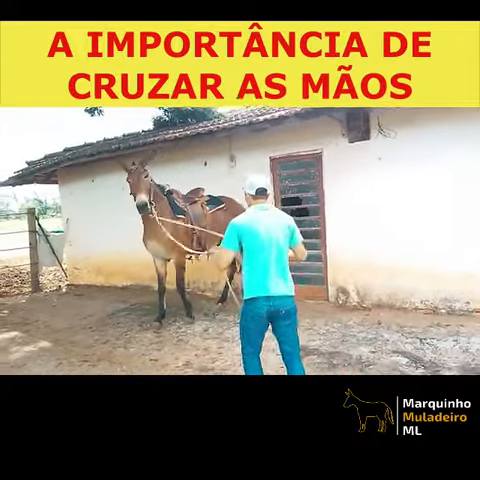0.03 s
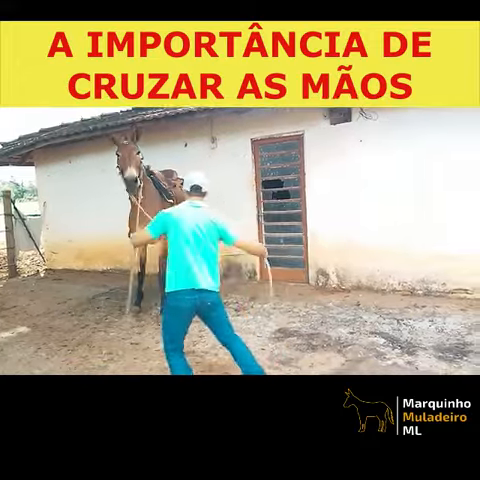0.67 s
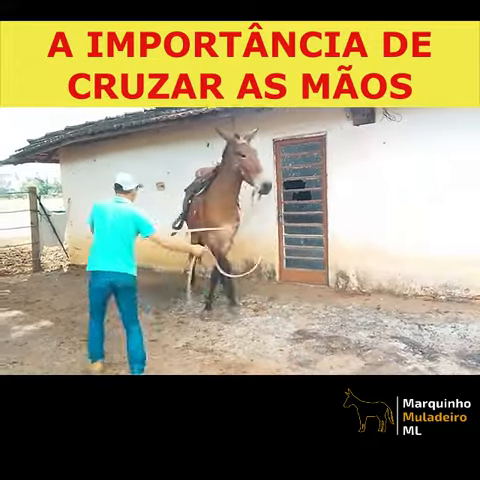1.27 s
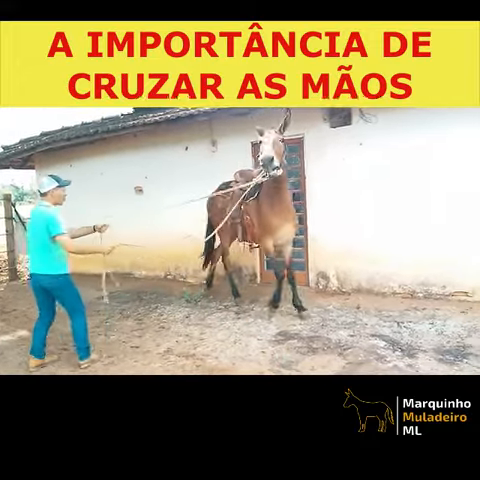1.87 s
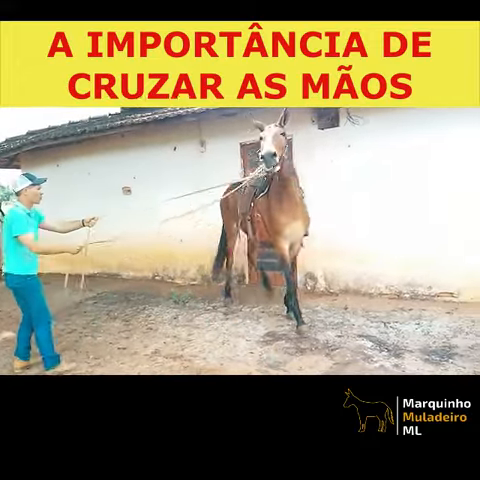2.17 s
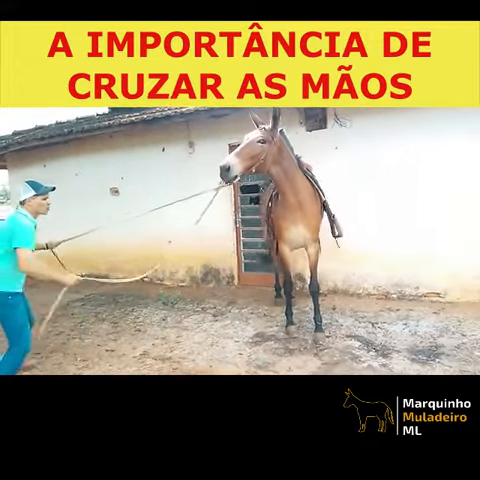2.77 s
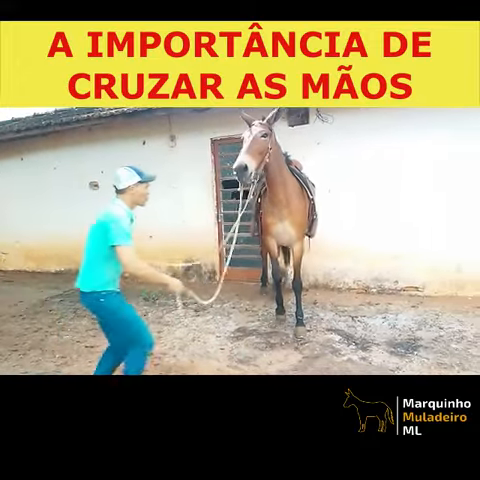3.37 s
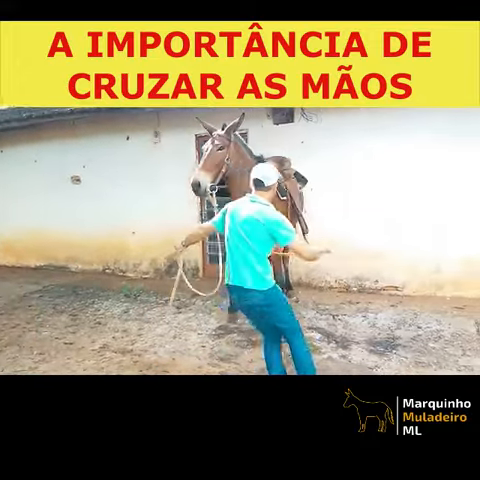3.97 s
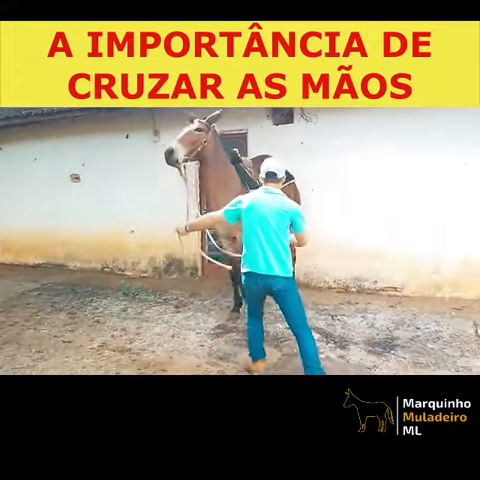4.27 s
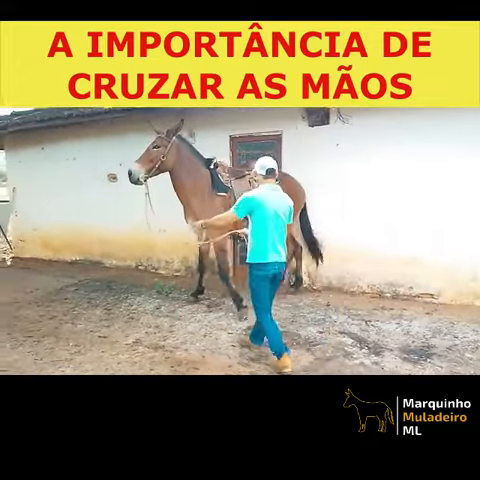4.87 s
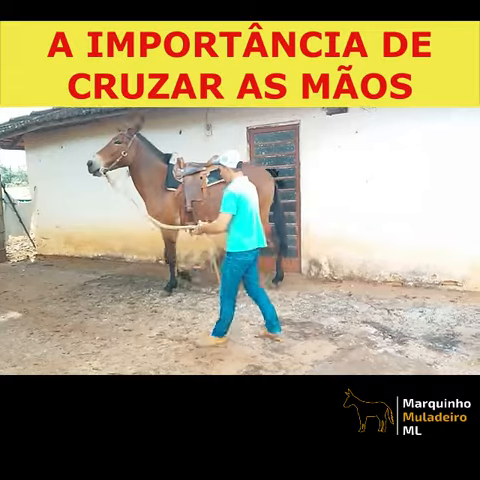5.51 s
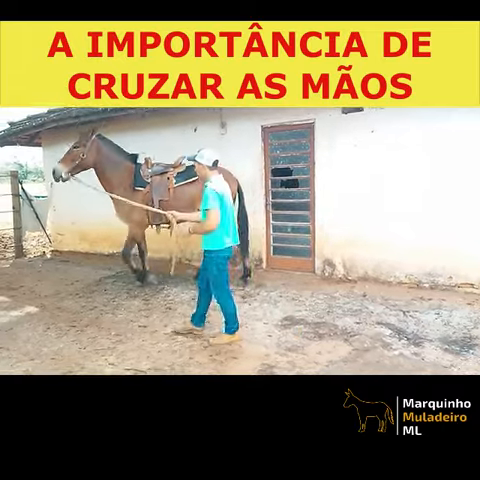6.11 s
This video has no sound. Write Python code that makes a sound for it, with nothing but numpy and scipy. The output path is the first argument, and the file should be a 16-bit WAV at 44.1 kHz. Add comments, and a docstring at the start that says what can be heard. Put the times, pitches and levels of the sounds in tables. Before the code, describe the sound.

Uneven hoof steps and dragging feet crunch on packed dirt in a quiet yard, with faint bird chirps.

```python
"""A mule steps sideways on hard, gritty dirt a few metres off, in still air; a house wall and eaves answer briefly.
Feet drag and kick up sand from the start. From 0.2 s hooves land: a sharp contact, then a crush of grit
that rings the hoof, deepened by weight, brightened by loose grit. Hooves and boots scuff in between,
with a few soft thumps from 1.3 s. Small birds whistle faintly from 1.75 s, a long hollow scrape comes
at 4.1 s, and a thin, far shrill enters near 6 s."""
import sys
import numpy as np
from scipy import signal
from scipy.fft import rfft, irfft
from scipy.io import wavfile
from scipy.ndimage import uniform_filter1d

SR = 44100
rng = np.random.default_rng(int(sys.argv[2]) if len(sys.argv) > 2 else 0)


def to_wav(s):
    """Save 16-bit WAV."""
    ch = np.atleast_2d(s).T  # columns
    pcm = np.round(np.clip(ch, -1, 1) * 32767)  # PCM
    wavfile.write(sys.argv[1], SR, pcm.astype(np.int16))


N = 270948
HIT_SAMPLES = 8192
# Spectrum of crushed dirt. Each row: frequency in Hz, gain in dB.
DIRT_SPECTRUM = [(30, -21), (90, -41), (150, -28.5), (200, -3), (280, 1.5), (600, -4), (1500, -2.5),
                 (2200, -1), (4300, 4.5), (7000, -10.5), (9000, -15), (12000, -25), (16000, -40)]


def undb(db):
    """Decibels to gain."""
    return 10 ** (np.asarray(db) / 20)


def unit(x):
    """Scale to rms 1."""
    return x / np.sqrt(np.mean(x ** 2))


def add(track, start_s, sound):
    """Mix a sound in at a time."""
    start = max(int(start_s * SR), 0)
    track[start:start + len(sound)] += sound[:N - start]


def band(x, lo_hz, hi_hz, order=3):
    """Causal band-pass."""
    sos = signal.butter(order, [lo_hz, min(hi_hz, SR / 2 - 1)], "band", fs=SR, output="sos")
    return signal.sosfilt(sos, x)


def ring(x, hz, width_hz):
    """One damped resonance, gain 1 at its centre."""
    return signal.lfilter(*signal.iirpeak(hz, hz / width_hz, fs=SR), x)


def colour(x, points, size=4096):
    """Minimum-phase filter through (Hz, dB) points."""
    hz, db = np.transpose(points)
    grid_hz = np.maximum(np.arange(size // 2 + 1) * SR / size, 1)
    gain = undb(np.interp(np.log(grid_hz), np.log(hz), db))
    cepstrum = irfft(np.log(gain))
    cepstrum[1:size // 2] *= 2
    cepstrum[size // 2 + 1:] = 0
    response = irfft(np.exp(rfft(cepstrum)))
    return signal.fftconvolve(x, response)[:len(x)]


def wander(rate_hz):
    """Smooth random drift, rms 1."""
    hold = int(SR / rate_hz)
    steps = np.repeat(rng.standard_normal(N // hold + 1), hold)
    return unit(uniform_filter1d(steps, hold)[:N])


def grains(per_s, spread_db, size=N):
    """Impulses at random moments, a few much larger than the rest; rms 1."""
    happens = rng.random(size) < per_s / SR
    strength = undb(spread_db * np.minimum(rng.exponential(size=size), 4))
    return unit(happens * strength * rng.choice([-1, 1], size))


def air(hush_db=-64.5, hush_swell_db=1, rumble_swell_db=3):
    """Distant outdoor hush over a faint, wavering rumble."""
    # Still air. Each row: frequency in Hz, gain in dB.
    spectrum = [(30, -27), (70, -22), (110, -16), (155, -4), (260, 12), (500, -14), (1500, 0), (3000, -1),
                (4400, 7), (6000, -19), (9000, -18), (16000, -39)]
    # Low rumble. Each row: time in seconds, mean level in dB.
    rumble_curve = [(.35, -79.5), (1.6, -91), (2.07, -72), (2.3, -87), (4.3, -84.5), (4.9, -72.5),
                    (5.4, -89.5), (6.1, -73)]
    hush = unit(colour(rng.standard_normal(N), spectrum)) * undb(hush_db + hush_swell_db * wander(0.47))
    rumble_db = np.interp(np.arange(N) / SR, *np.transpose(rumble_curve))
    rumble = unit(band(rng.standard_normal(N), 89, 120, order=2))
    return hush + rumble * undb(rumble_db + rumble_swell_db * wander(5.2))


def drag_envelopes(attack_s=0.014, release_s=0.033, rest_rub_db=-69.5, rest_sand_db=-91):
    """Gains of rub and sand: each drag sets in, holds and dies back to feet only shifting their load."""
    # Drags over loose dirt. Each row: start in seconds, length in seconds, relative rub and sand in dB.
    drags = [(0.024, 0.091, -46, -71), (0.225, 0.14, -63.5, -56), (0.553, 0.055, -59, -51.5),
             (0.64, 0.28, -53, -56), (0.972, 0.065, -43.5, -70), (1.252, 0.074, -56, -56),
             (1.918, 0.18, -49.5, -49.5), (2.274, 0.21, -49, -47), (2.552, 0.44, -56.5, -53.5),
             (3.095, 0.073, -42, -38.5), (3.335, 0.22, -53.5, -51.5), (3.664, 0.11, -47, -53),
             (3.863, 0.61, -53.5, -50.5), (4.204, 0.06, -47.5, -43), (4.343, .05, -49.5, -46),
             (4.444, 0.034, -43, -42.5), (4.601, 0.064, -49.5, -52.5), (4.686, 0.046, -57, -47.5),
             (4.871, 0.099, -53, -52.5), (5.005, .055, -69, -48.5), (5.086, 0.12, -54, -51),
             (5.336, 0.12, -48.5, -47), (5.51, 0.11, -45, -49.5), (5.643, 0.15, -61, -60),
             (5.874, 0.31, -55.5, -59)]
    t = np.arange(N) / SR
    rub, sand = undb(rest_rub_db), undb(rest_sand_db)
    for start_s, length_s, rub_db, sand_db in drags:
        attack = np.clip((t - start_s) / attack_s, 0, 1)
        motion = attack * np.exp(-np.maximum(t - start_s - length_s, 0) / release_s)
        rub = np.maximum(rub, motion * undb(rub_db))
        sand = np.maximum(sand, motion * undb(sand_db))
    return rub, sand


def hoof(push, detune=0.024):
    """The push plus the hoof's damped resonances, which shift with every footing."""
    # Hoof on packed earth. Each row: frequency in Hz, width in Hz, gain over the bare push in dB.
    modes = [(392, 120, -2), (1008, 440, 12.5), (1345, 570, 10.5), (2750, 210, 8.5), (3575, 620, 7),
             (5590, 1500, 6), (7100, 660, 0)]
    shifts = np.exp(detune * rng.standard_normal(len(modes)))
    return push + sum(undb(db) * ring(push, hz * shift, width_hz)
                      for (hz, width_hz, db), shift in zip(modes, shifts))


def ground_patches(x, swing_db=4.5, rate_hz=22, bands=22):
    """A dragging foot meets ever new ground, so each band of its scrape drifts in level."""
    spectrum = rfft(x)
    hz = np.linspace(1, SR / 2, len(spectrum))
    position = np.interp(np.log(hz), np.log([250, 11000]), [0, bands - 1])
    parts = (irfft(spectrum * np.maximum(1 - abs(position - k), 0), N) for k in range(bands))
    return unit(sum(part * undb(swing_db * wander(rate_hz)) for part in parts))


def crumbs(lo_hz, hi_hz, per_size_per_s, sizes=12, q=13):
    """Loose clods or pebbles knock together, each size at its own well-damped pitch."""
    pitches_hz = np.geomspace(lo_hz, hi_hz, sizes) * np.exp(0.038 * rng.standard_normal(sizes))
    ticks = sum(ring(grains(per_size_per_s, 0.97), hz, hz / q) / np.sqrt(hz) for hz in pitches_hz)
    return unit(band(ticks, lo_hz, hi_hz))


def shuffle(rub_db=-1, clod_db=-3, pebble_db=-3, catch_db=4.5):
    """Dragging feet catch and slip: earth rubs and clods tumble low, sand and pebbles rasp high."""
    # Sand rasping under a foot. Each row: frequency in Hz, gain in dB.
    rasp_spectrum = [(1200, -34), (2200, -11.5), (2800, -10), (3300, -1), (3950, 4.5), (4800, -1.5),
                     (6100, -3), (7000, -6), (9000, -16.5), (12000, -32.5), (16000, -52)]
    rub_gain, sand_gain = drag_envelopes()
    earth = colour(hoof(grains(per_s=1800, spread_db=3.2)), DIRT_SPECTRUM)
    rub = ground_patches(band(earth, 72, 3730)) * undb(rub_db)
    sand = ground_patches(colour(grains(per_s=2600, spread_db=1), rasp_spectrum))
    clods = crumbs(226, 1927, per_size_per_s=15) * undb(clod_db)
    pebbles = crumbs(2140, 6420, per_size_per_s=23) * undb(pebble_db)
    stick_slip = unit(undb(catch_db * wander(75)))
    return stick_slip * ((rub + clods) * rub_gain + (sand + pebbles) * sand_gain)


def sand_sprays(trim_db=-2):
    """Kicked sand swells and settles as a thin, high patter."""
    # Sweeps of a foot. Each row: centre in seconds, Gaussian sigma in seconds, level in dB before trim.
    sweeps = [(0.128, 0.022, -53.5), (1.27, 0.014, -51.5), (2.218, 0.012, -50.5), (2.35, 0.013, -53),
              (2.902, 0.018, -52), (3.11, .011, -52), (3.807, .035, -51), (4.237, 0.0097, -48),
              (4.461, 0.012, -48), (5.123, .019, -49), (5.435, .014, -45)]
    # Flying sand. Each row: frequency in Hz, gain in dB.
    spectrum = [(2000, -42), (5000, 4), (8000, 2), (10500, -6), (13000, -20), (16000, -31)]
    t = np.arange(N) / SR
    swell = sum(undb(db) * np.exp(-.5 * ((t - centre_s) / sigma_s) ** 2)
                for centre_s, sigma_s, db in sweeps)
    patter = unit(colour(grains(per_s=1500, spread_db=3.4), spectrum))
    return patter * swell * undb(trim_db)


def ringing_colour(push, lo_hz=1800, hi_hz=8500, q=32, ring_db=7, count=5):
    """A few narrow resonances at random pitches colour the crunch, different at every step."""
    pitches_hz = lo_hz * (hi_hz / lo_hz) ** rng.random(count)
    return undb(ring_db) * sum(ring(push, hz, hz / q) for hz in pitches_hz)


def gravel_cracks(push, crack_db=-4, lo_hz=1400, hi_hz=7500, q=11, count=4):
    """Single stones crack as the load builds, each at its own moment and pitch."""
    load, out = np.cumsum(abs(push)), np.zeros(len(push))
    for load_share, pitch, strength in rng.random((count, 3)):
        hz = lo_hz * (hi_hz / lo_hz) ** pitch
        snap = signal.unit_impulse(len(push), int(np.searchsorted(load, load_share * load[-1])))
        out += strength * ring(snap, hz, hz / q) / np.sqrt(hz)
    return undb(crack_db) * out * np.linalg.norm(push) / np.linalg.norm(out)


def footfall(push, level_db, weight_db, grit_db, hiss_db=-16, hiss_slope=2.12, top_db_per_octave=9.5):
    """Hoof and dirt ring: weight adds thud below the clop, grit adds crack above it; hiss lies on top."""
    sound = colour(hoof(push) + ringing_colour(push) + gravel_cracks(push), DIRT_SPECTRUM)
    # Duller steps lose their top treble; brighter ones hiss higher.
    top_hz = np.clip(10000 * 2 ** (grit_db / top_db_per_octave), 10500, 20000)
    edges_hz = [30, 700, 2200, 6500, top_hz]  # thud, clop, crack, hiss
    parts = [band(sound, lo, hi) for lo, hi in zip(edges_hz, edges_hz[1:])]
    balance_db = [weight_db, 0, grit_db, hiss_db + hiss_slope * grit_db]
    energy = SR / 100  # 10 ms at rms 1
    return undb(level_db) * sum(part * undb(db) * np.sqrt(energy / np.sum(part ** 2))
                                for part, db in zip(parts, balance_db))


def hoof_strikes(contact_db=-12, bite_s=0.0013, knock_q=7, knock_trim_db=-1, rim_hz=3950, rim_spread=.035,
                 click_q=11, click_trim_db=0.5, ground_db=-35, ground_s=0.0013):
    """The rim bites and clicks, grit collapses, the sole's hollow knocks, weight thumps the ground."""
    # Hoof contacts. Each row: start in seconds, crush decay in seconds, knock in Hz, clop level in dB,
    # weight and grit in dB over the clop, knock and click in dB before their trims.
    contacts = [(.194, .0057, 1270, -40, -12, 3, -5, 15.5), (0.285, .0056, 1260, -43, -12, 4, -7, 21),
                (.381, .0062, 1760, -36, -1, -3.5, 2.5, -1), (0.404, .007, 342, -43.5, 8.5, 1.5, 2, 3),
                (0.619, .0085, 320, -30, -1, -9, 5, -6), (.631, .0082, 1290, -39, -8, 6, 4, 3),
                (.775, .012, 650, -40, -2.5, -1.5, -3, -7), (.956, .0036, 1640, -32.5, -6, 4, 1, 7),
                (0.966, .015, 1650, -32, -21, 10.5, 0.5, 1), (.982, .0036, 666, -35, -1, 12, 6, 0),
                (1.275, .01, 770, -40.5, 7, -10, -7, 4), (1.338, .0064, 335, -52, 15.5, 8.5, 6, 5),
                (1.361, .0044, 654, -36.5, 4, 4.5, 9, 12), (1.381, .014, 1810, -32.5, 3, 9.5, 1, 0.5),
                (1.39, .003, 1530, -21, -11, -1, 1, -4), (1.398, .0026, 1510, -29, -11, -6, -10, 2),
                (1.421, .0051, 420, -32, 2, 4.5, 3.5, 0.5), (1.427, .0037, 1920, -29.5, -14, -3, 7, 3),
                (1.439, .002, 600, -40.5, 7.5, 10.5, -1, -8), (1.64, .011, 845, -50.5, 11, 6, 1, -3),
                (1.668, .0024, 634, -48.5, 13.5, -2, -1, -4), (1.69, .006, 840, -41, 3.5, 5.5, 8, -3),
                (1.7, .003, 488, -39.5, 9.5, -2, -10, 17), (1.712, .0024, 1210, -29, -14, 3.5, -3.5, 5.5),
                (1.843, .0046, 1540, -24, -3.5, 3.5, 7.5, 4), (1.861, .0025, 1480, -23, -8, -13, 8, 4),
                (2.089, .0097, 1600, -42, -10, 9, -2, 7.5), (2.168, .022, 1370, -34.5, -5.5, 0, -9, -2.5),
                (2.287, .071, 970, -34, -12, -23, -0.5, 4), (2.518, .008, 424, -42.5, 5.5, -5.5, 10, 7.5),
                (2.721, .0025, 595, -44, 1, 3, -7, 0), (2.745, .004, 667, -32, -1.5, -3, 9, -8),
                (2.755, .006, 800, -37, -3, -5, 13, -3), (2.769, .0028, 660, -37.5, 7, 2, 18, -14),
                (2.778, .0046, 775, -32.5, -2, 2, 17.5, -14), (2.811, .0072, 923, -31, -4, -0.5, 3.5, 1.5),
                (2.837, .016, 1000, -37.5, -4, 5.5, 1.5, -5), (2.883, .0051, 870, -48, -10, 9.5, 3, -4),
                (3.116, .025, 1431, -37, -25, -12, 16, -5), (3.143, .0065, 1425, -29.5, -14, -2.5, 7.5, -5),
                (3.323, .0045, 1010, -34, -2, 2.5, 13, -8), (3.446, .003, 1582, -39.5, -4.5, 6, 4, 11.5),
                (3.592, .0041, 1020, -23.5, -1, 3, 0, -8), (3.636, 0.0053, 1140, -31, -12, 7, -8, 1),
                (3.795, .002, 830, -54, 1, 15, -1, -3), (3.847, .0055, 390, -42.5, .5, 3, 1, -1),
                (3.932, .0025, 1365, -32.5, -14, -4, 16, -11), (4.05, .0069, 410, -49.5, 12, 4, 0, -1),
                (4.064, .0067, 1365, -33.5, -6, 5.5, 5.5, -0.5), (4.499, .003, 1070, -28.5, -3, 5, 9, 17),
                (4.507, .003, 1076, -29.5, -15, 2, -2, 16.5), (4.811, 0.003, 692, -30, -2, -0.5, 1.5, 4),
                (4.842, .012, 1610, -34, -6.5, -10, 13, 1), (5.066, .014, 930, -36.5, 3, 10, 12, 14),
                (5.093, .011, 970, -53, -27, 18.5, -4, -11), (5.259, .005, 1450, -48, -26, 7.5, 8, -3),
                (5.309, 0.01, 1500, -44, -8, 13.5, -4, 7.5), (5.334, .0052, 437, -34.5, -.5, -3.5, 6, 8),
                (5.434, .0026, 1450, -30.5, -9.5, -7.5, 12, -3),
                (5.505, .0034, 1650, -37, -20, -5.5, 7, -1), (5.599, .0083, 1040, -31, -1.5, -4, 5, 3),
                (6.008, .006, 2200, -37, -3.5, -2.5, 5, 10.5)]
    out, t = np.zeros(N), np.arange(HIT_SAMPLES) / SR
    bite = 1 - np.exp(-t / bite_s)
    load = t / ground_s * np.exp(1 - t / ground_s)
    for start_s, crush_s, knock_hz, level_db, weight_db, grit_db, knock_db, click_db in contacts:
        push = grains(per_s=4500, spread_db=3.18, size=HIT_SAMPLES) * np.exp(-t / crush_s) * bite
        push[int(bite_s * SR)] += undb(contact_db) * np.linalg.norm(push)
        knock = undb(knock_trim_db + knock_db) * ring(push, knock_hz, knock_hz / knock_q)
        click_hz = rim_hz * np.exp(rim_spread * rng.standard_normal())
        click = undb(click_trim_db + click_db) * ring(push, click_hz, click_hz / click_q)
        thump = undb(level_db + weight_db + ground_db) * band(load, 53, 160, order=1)
        add(out, start_s, footfall(push + knock + click, level_db, weight_db, grit_db) + thump)
    return out


def scuffs():
    """A foot slides: a dense rush of grains that swells and stops."""
    # Short slides. Each row: centre in seconds, Gaussian sigma in seconds, clop level in dB,
    # weight and grit in dB over the clop.
    slides = [(0.226, 0.0081, -36, -12, 1), (0.732, 0.0047, -39.5, -13, -3.5),
              (0.812, 0.0094, -54, -20, 11.5), (.972, 0.0034, -43, 10.5, 13.5),
              (1.707, 0.0088, -29.5, -16, 3.5), (1.833, 0.0052, -41, -3, 6.5), (2.344, .012, -32, -4, -0.5),
              (2.674, 0.011, -37.5, -6, 3), (3.161, .007, -29.5, -3.5, 1), (3.766, .021, -35.5, -1.5, 2.5),
              (4.005, 0.012, -46, -5, 10), (4.073, 0.0097, -29, -12.5, 6), (4.526, 0.012, -31.5, -1.5, -4),
              (5.424, 0.0099, -53, 2, 16), (5.838, 0.01, -29, -5, -2)]
    out, t = np.zeros(N), np.arange(HIT_SAMPLES) / SR
    peak_s = t[-1] / 2
    for centre_s, sigma_s, level_db, weight_db, grit_db in slides:
        swell = np.exp(-.5 * ((t - peak_s) / sigma_s) ** 2)
        push = grains(per_s=7000, spread_db=3.05, size=HIT_SAMPLES) * swell
        add(out, centre_s - peak_s, footfall(push, level_db, weight_db, grit_db))
    return out


def thumps(pitch_sag=0.232, roughness=0.74, trim_db=-1):
    """Soft, hollow thumps: low cycles that sag as the push dies away."""
    # Each row: start in seconds, length in seconds, starting pitch in Hz, level in dB before trim.
    pushes = [(1.293, 0.016, 298, -44), (2.938, 0.017, 418, -40.5), (3.512, 0.011, 433, -43),
              (4.604, 0.039, 320, -48.5), (4.872, 0.11, 320.4, -54)]
    out = np.zeros(N)
    for start_s, length_s, start_hz, db in pushes:
        progress = np.linspace(0, 1, int(length_s * SR))
        cycles = np.cumsum(start_hz * (1 - pitch_sag * progress)) / SR
        swell = np.sqrt(progress * (1 - progress)) * (1 + roughness * wander(407)[:len(progress)])
        add(out, start_s, undb(db + trim_db) * unit(np.sin(2 * np.pi * cycles) * swell))
    return band(out, 160, 890)


def birds(flutter_depth=0.029, trim_db=-4):
    """Thin, falling whistles that flutter a little."""
    # Each row: start in seconds, length in seconds, start and end pitch in Hz, level in dB before trim.
    whistles = [(1.752, 0.077, 6770, 6200, -50), (1.995, .042, 4910, 4150, -51.5),
                (2.034, 0.19, 7700, 6470, -55), (2.176, 0.1, 6010, 5000, -47),
                (2.405, 0.049, 5870, 4900, -49), (2.501, 0.049, 4360, 4040, -46),
                (3.239, 0.02, 6130, 4870, -43), (3.374, 0.053, 6120, 5200, -47.5),
                (5.56, 0.075, 6840, 5700, -57), (5.884, 0.048, 4770, 3980, -47)]
    out = np.zeros(N)
    for start_s, length_s, start_hz, end_hz, db in whistles:
        progress = np.linspace(0, 1, int(length_s * SR))
        flutter = 1 + flutter_depth * wander(780)[:len(progress)]
        hz = (start_hz + (end_hz - start_hz) * progress) * flutter
        whistle = np.sin(2 * np.pi * np.cumsum(hz) / SR) * np.sqrt(progress * (1 - progress))
        add(out, start_s, undb(db + trim_db) * unit(whistle))
    return out


def pivot(hz=1040, width_hz=420, trim_db=-2):
    """A long scrape, as of a sole pivoting: dense slips ring one hollow resonance."""
    # Each row: time in seconds, level in dB before trim.
    level_curve = [(4.1, -48), (4.16, -51), (4.27, -46), (4.34, -50.5), (4.47, -50), (4.52, -59)]
    level_db = np.interp(np.arange(N) / SR, *np.transpose(level_curve), left=-np.inf, right=-np.inf)
    slips = grains(per_s=740, spread_db=6.4)
    return unit(ring(ring(slips, hz, width_hz), hz, width_hz)) * undb(level_db + trim_db)


def shrill(hz=4650, width_hz=620, rough_db=3):
    """A thin, rough shrill far off, perhaps an insect: fast clicks in one narrow resonance."""
    # Each row: time in seconds, mean level in dB.
    level_curve = [(5.97, -64), (6.03, -47.5), (6.13, -52)]
    level_db = np.interp(np.arange(N) / SR, *np.transpose(level_curve), left=-np.inf)
    clicks = grains(per_s=1000, spread_db=0.92)
    return unit(ring(ring(clicks, hz, width_hz), hz, width_hz)) * undb(level_db + rough_db * wander(39.9))


def yard(x, t60_s=0.27, tail_db=-1, gap_s=.006, wall_s=0.015, wall_db=-14, positions=16):
    """Adds a wall echo and scatter from eaves, fence and ground; the paths change as the source moves."""
    t, wet = np.arange(SR // 2) / SR, np.zeros(N)
    decay = np.exp(-np.log(1000) * t / t60_s) * (t > gap_s)
    position = np.linspace(0, positions - 1, N)
    for k in range(positions):
        scatter = grains(per_s=5000, spread_db=0.69, size=len(t)) * decay
        response = undb(tail_db) * scatter / np.linalg.norm(scatter)
        response[int(wall_s * rng.uniform(.7, 1.3) * SR)] += undb(wall_db)
        near = np.flatnonzero(abs(position - k) < 1)
        crossfade = np.cos(np.pi / 2 * (position[near] - k))
        add(wet, near[0] / SR, signal.fftconvolve(x[near] * crossfade, response))
    return x + colour(wet, [(100, -7), (400, -5.5), (1500, -1), (5000, -5.5), (12000, -5.5)])


def scene():
    """Feet in the yard, birds and a thin shrill further off, over still air; mono."""
    feet = yard(hoof_strikes() + scuffs() + shuffle() + sand_sprays() + pivot() + thumps())
    far_birds = yard(birds(), t60_s=0.65, tail_db=0, wall_db=-30)
    return (feet + far_birds + shrill() + air())[None]


def record(dry):
    """Steep low-pass at 15.7 kHz."""
    return signal.sosfilt(signal.ellip(8, .2, 70, 15700, fs=SR, output="sos"), dry)


dry = scene()
out = record(dry)
to_wav(out)
```